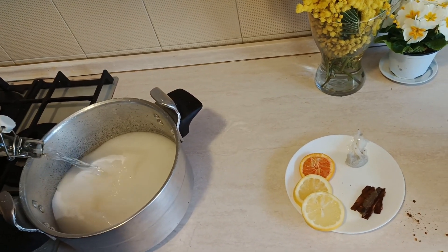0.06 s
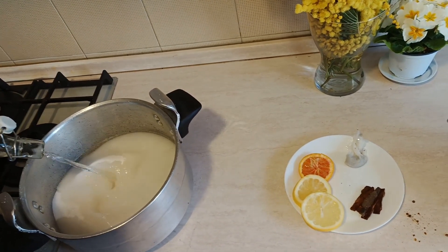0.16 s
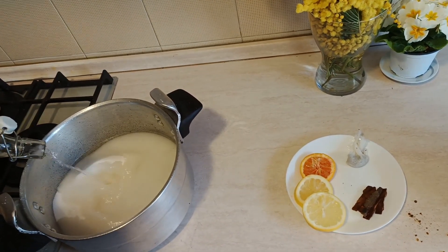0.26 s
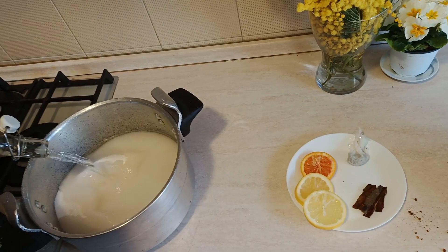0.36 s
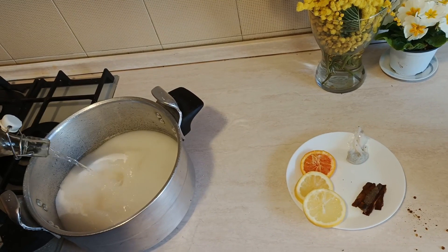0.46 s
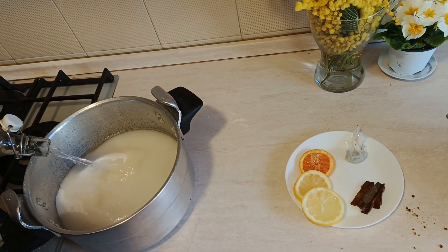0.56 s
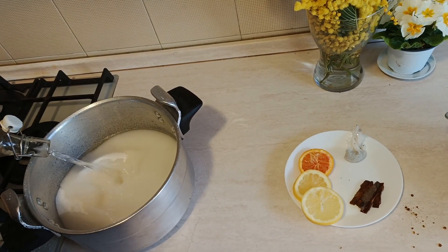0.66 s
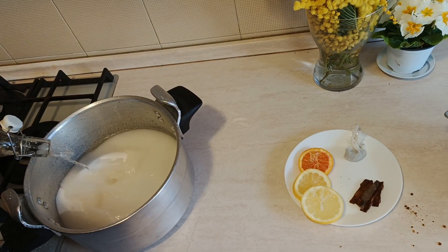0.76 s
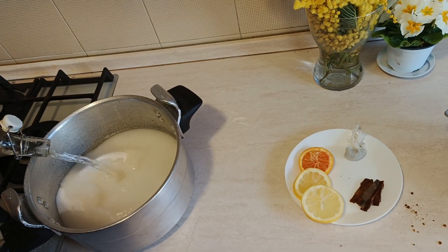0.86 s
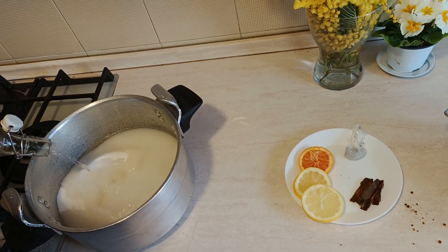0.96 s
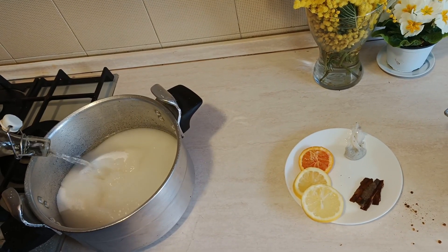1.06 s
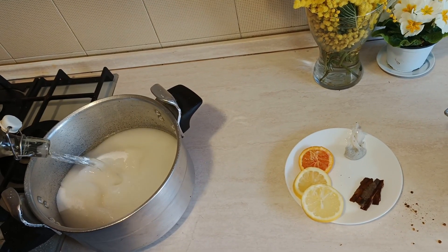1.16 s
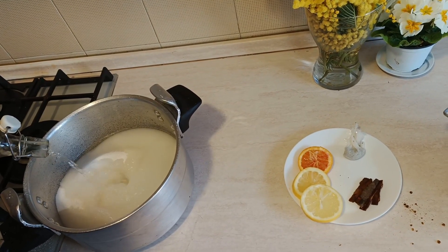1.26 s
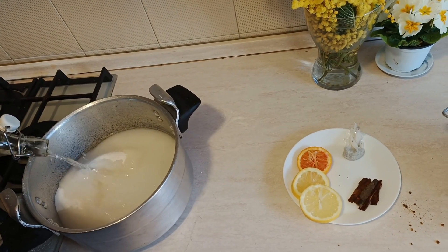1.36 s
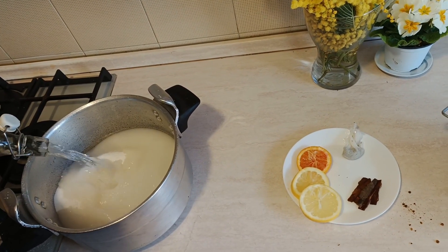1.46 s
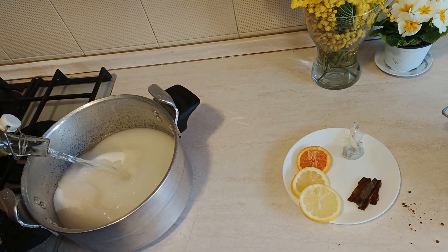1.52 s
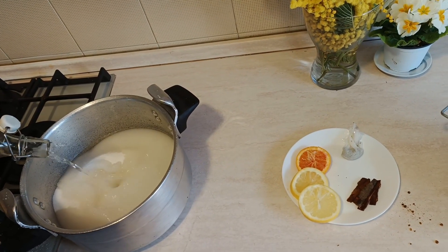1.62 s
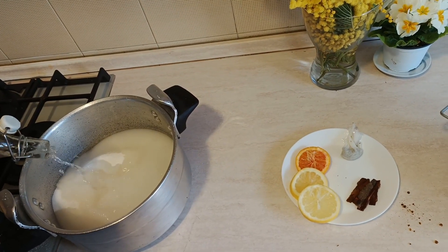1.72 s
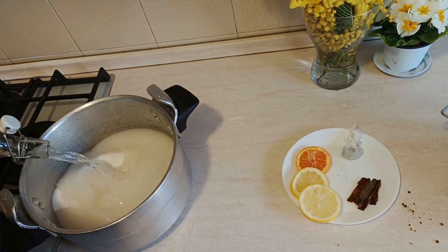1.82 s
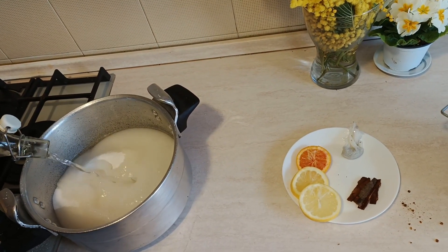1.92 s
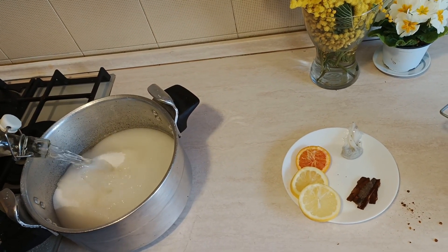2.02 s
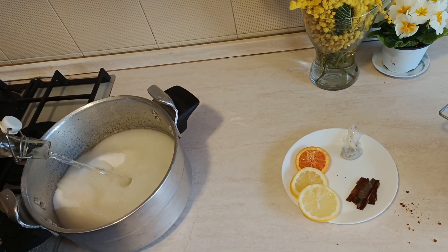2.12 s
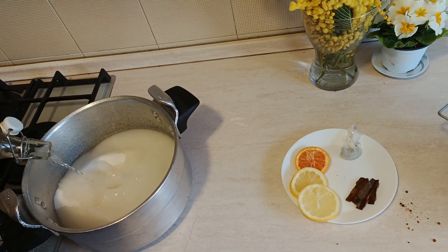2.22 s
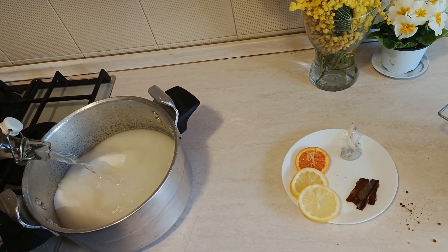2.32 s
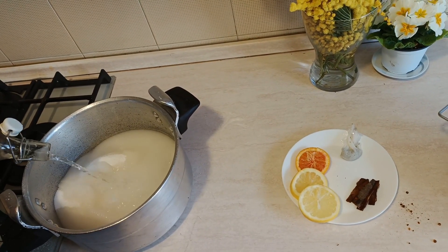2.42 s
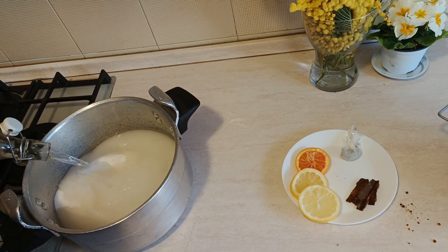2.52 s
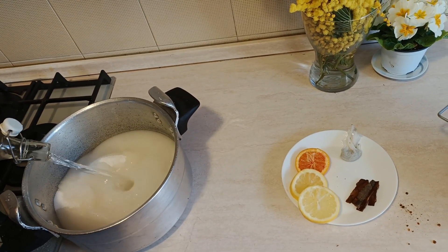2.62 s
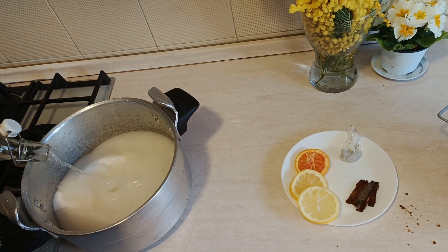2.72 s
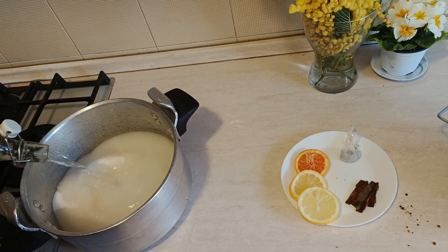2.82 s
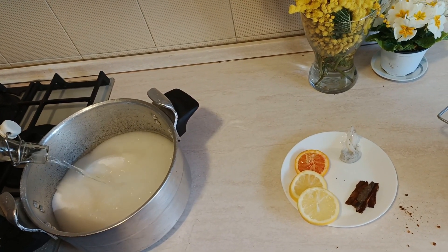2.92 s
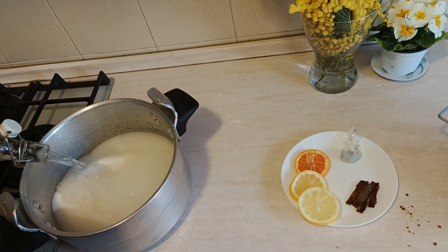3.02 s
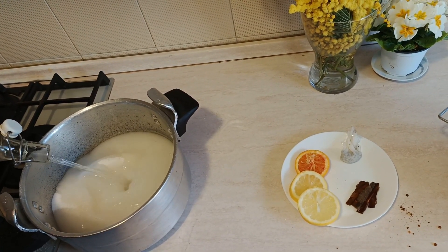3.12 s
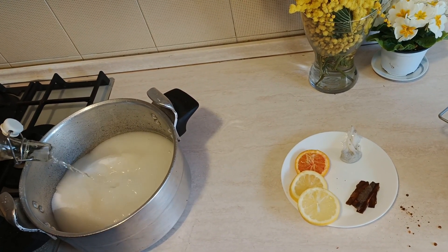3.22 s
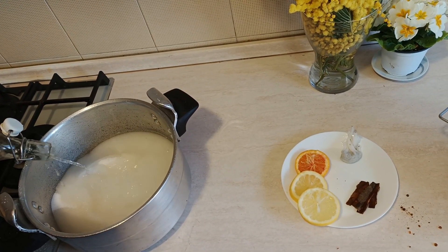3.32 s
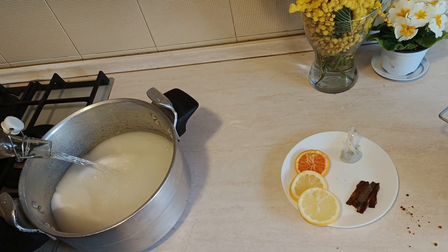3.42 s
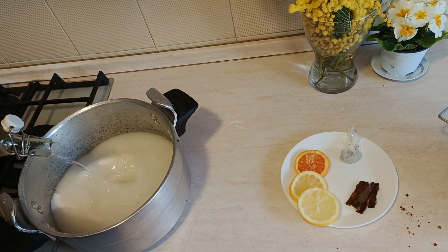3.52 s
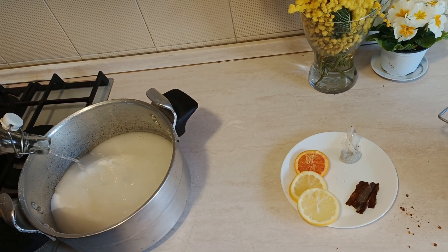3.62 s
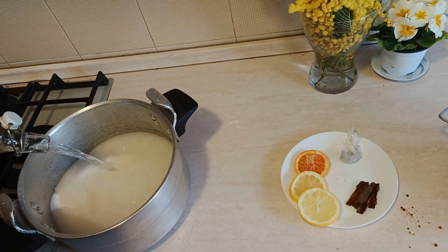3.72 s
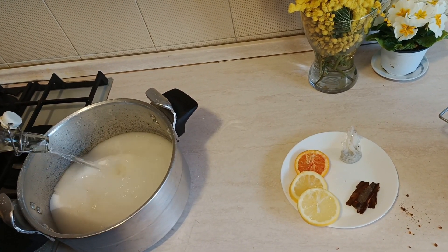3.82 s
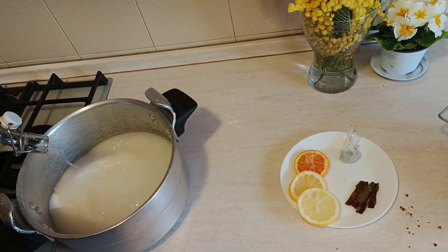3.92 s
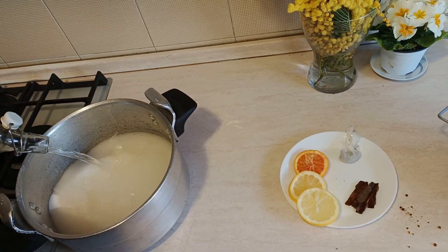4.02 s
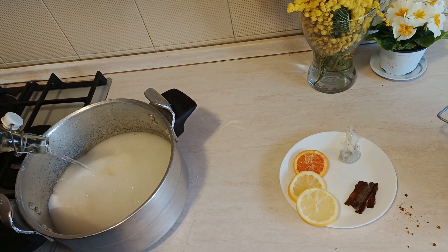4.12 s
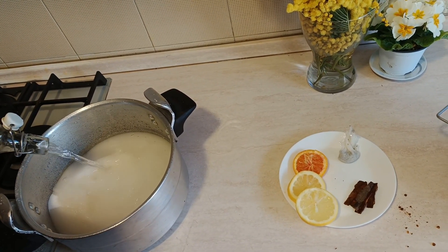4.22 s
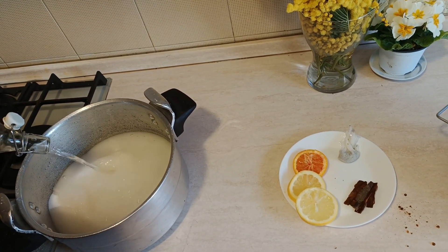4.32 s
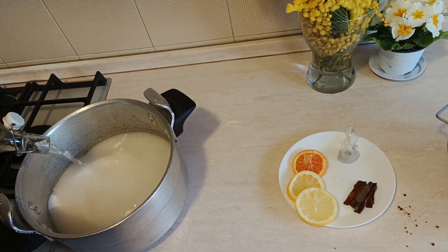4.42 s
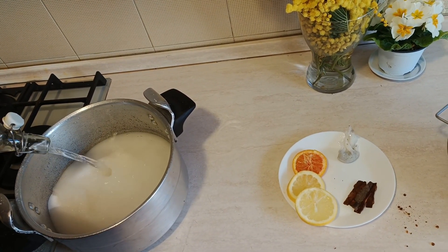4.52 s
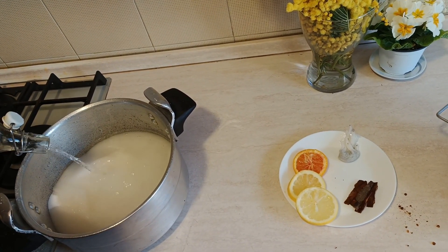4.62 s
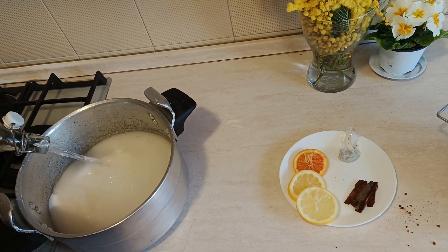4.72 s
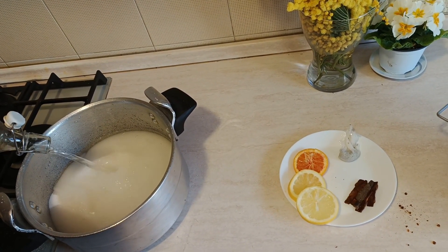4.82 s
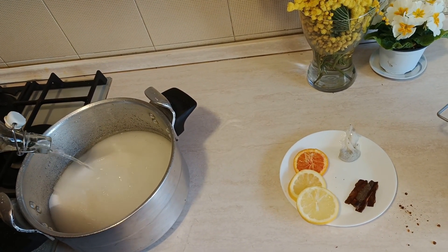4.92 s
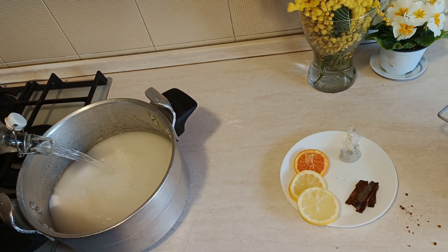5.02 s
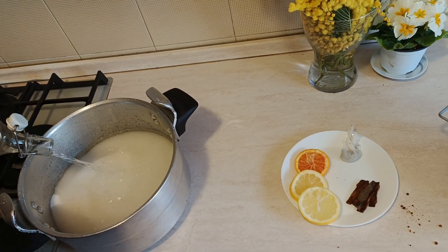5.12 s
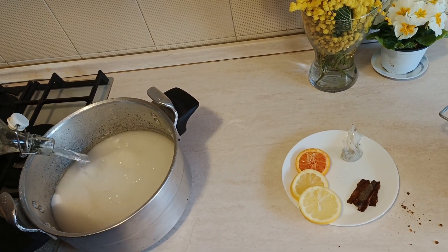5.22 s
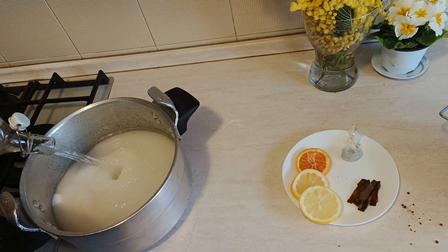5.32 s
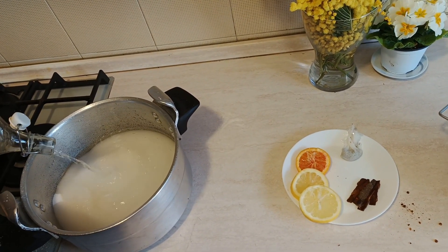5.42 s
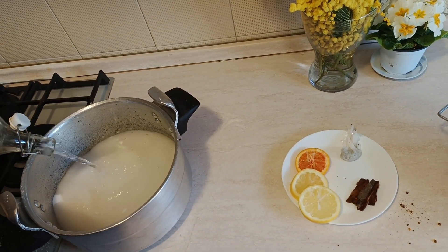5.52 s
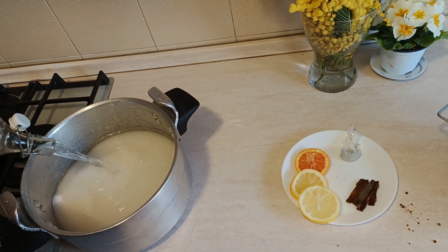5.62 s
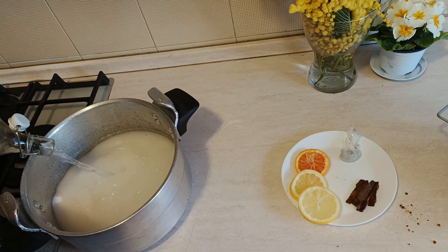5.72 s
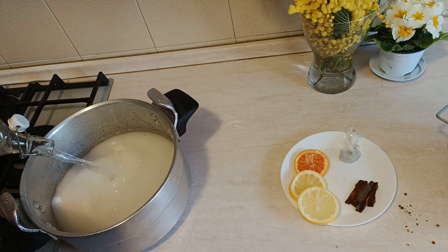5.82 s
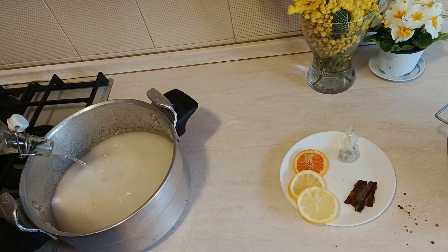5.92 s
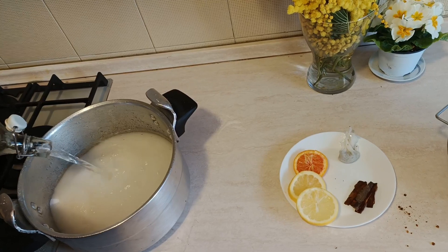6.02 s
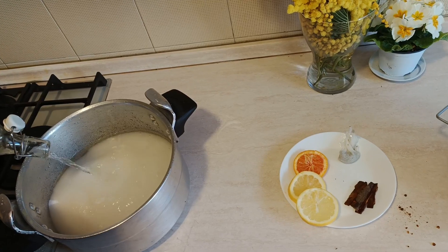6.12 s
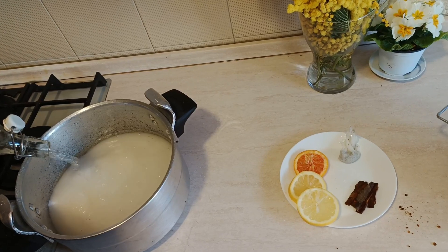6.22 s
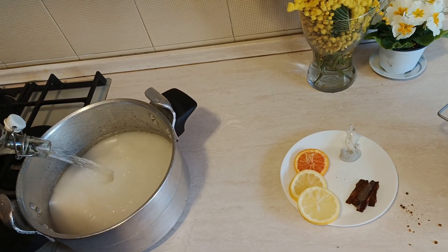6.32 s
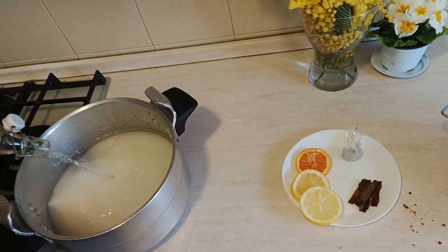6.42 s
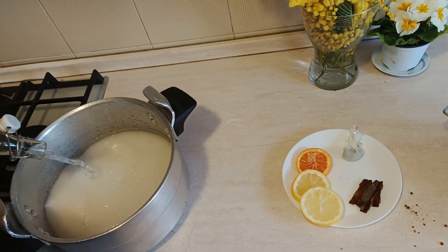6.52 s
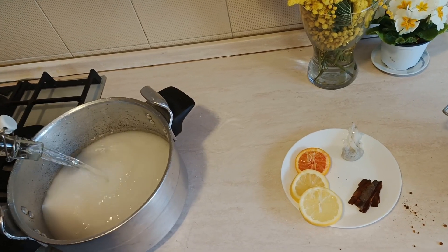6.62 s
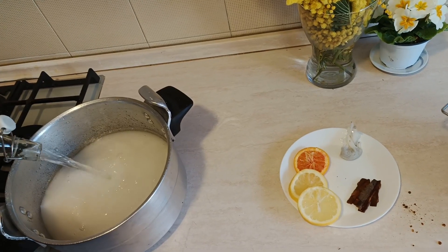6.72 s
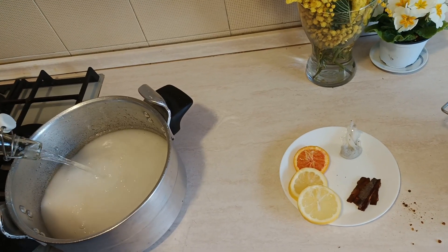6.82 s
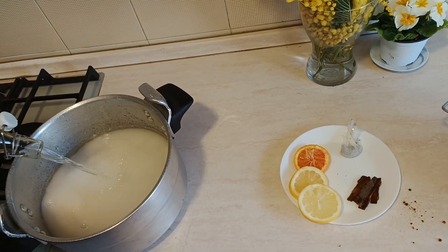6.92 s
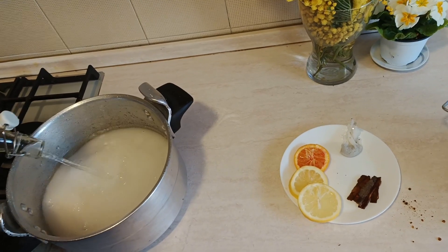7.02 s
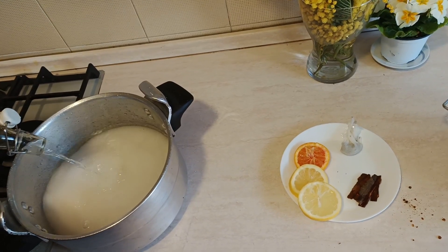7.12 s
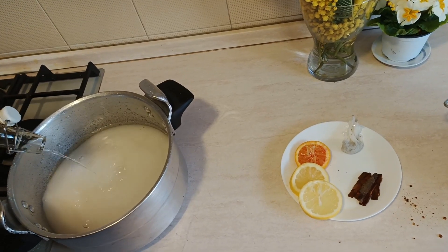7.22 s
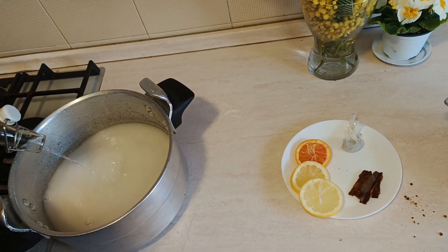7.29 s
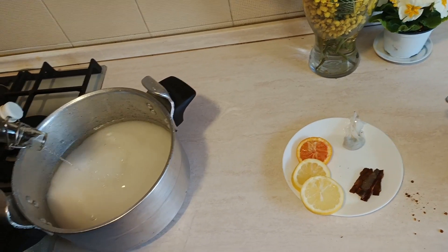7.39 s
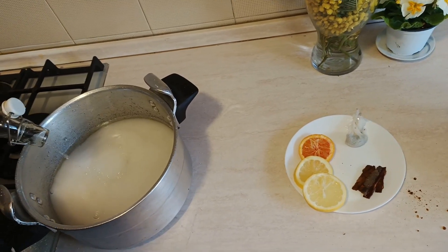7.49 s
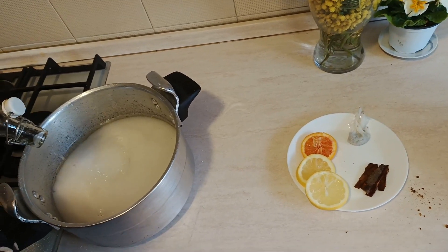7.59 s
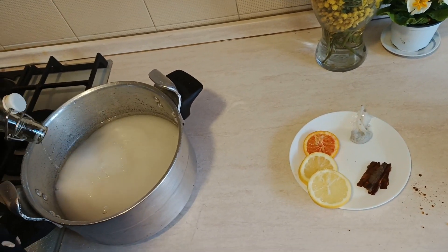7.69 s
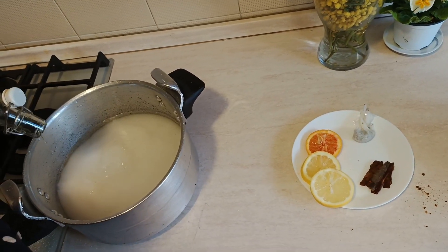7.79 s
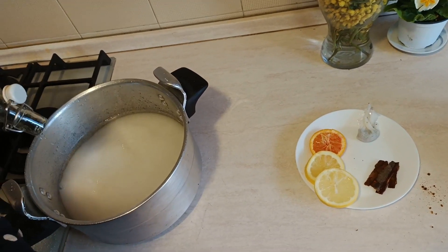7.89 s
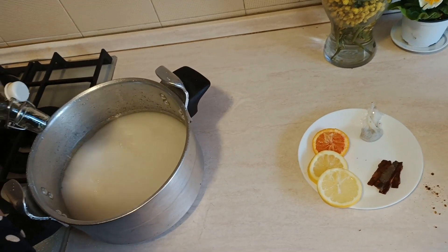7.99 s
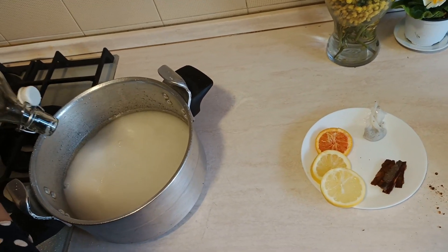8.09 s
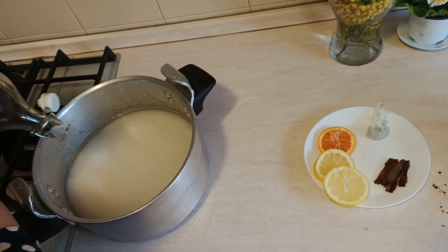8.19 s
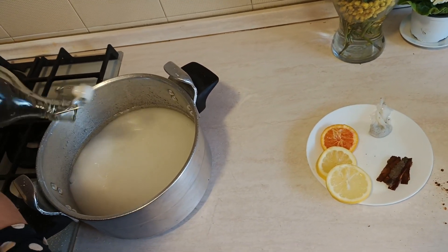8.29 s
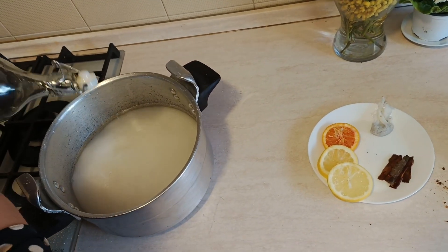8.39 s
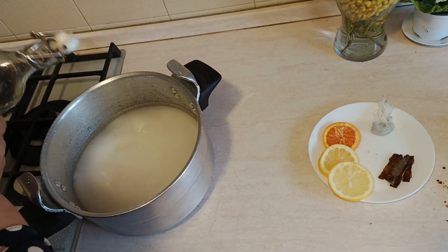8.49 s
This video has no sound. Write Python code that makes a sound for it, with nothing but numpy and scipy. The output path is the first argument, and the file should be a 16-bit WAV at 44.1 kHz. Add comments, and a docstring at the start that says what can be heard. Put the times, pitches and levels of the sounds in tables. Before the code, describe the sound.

From the start, water is already pouring from a glass bottle into liquid in a wide metal pot, heard close in stereo in a small kitchen with short reflections. It comes in quick glugs, about four a second, each a burst of fizzy bubbles, bright snapping plips and tiny spray ticks, with a faint metallic ring from the pot. From about 2 seconds the gurgle grows fuller; especially loud plops pop out near 4.0, 4.5 and 5.2 seconds. Low, hollow air gulps and deep gurgling are strongest around 5 to 6.5 seconds. Between 6.9 and 7.5 seconds, several dull finger bumps touch the microphone, mostly on the right, while the pour weakens. The last drops fall around 7.8 seconds. Only a soft appliance hum is left, with barely audible touches, until the wire stopper clinks sharply twice on the bottle neck at about 8.5 seconds, with tiny rattles around it.

```python
"""In a small kitchen, water glugs from a glass bottle into a wide metal pot, four or five surges a second.
Clumped grains make the fizz, slosh and gurgle; dying sines make the bubbles and the air gulped into the bottle.
The water rings the pot's modes, noise ticks make the spray, and dents with a slow swing make the finger bumps.
The last drops fall; shaped noise hums like an appliance behind, and struck modes make the wire stopper
clink twice on the bottle neck among fainter touches."""
import sys
import numpy as np
from scipy import signal
from scipy.fft import rfft, irfft
from scipy.io import wavfile

SR = 44100
rng = np.random.default_rng(int(sys.argv[2]) if len(sys.argv) > 2 else 0)


def amplitude_ratio(level_db):
    """Convert a level in decibels to the matching linear amplitude (field) ratio."""
    exponent = np.asarray(level_db, float) / 20
    return 10 ** exponent


def wav_record(signal):
    """Record a signal, one row per channel, as 16-bit PCM in the file named by sys.argv[1]."""
    frames = np.transpose(np.atleast_2d(signal))
    bounded = np.clip(frames, -1, 1)
    # unit amplitude maps onto the largest positive 16-bit level
    quanta = np.round(bounded * 32767).astype(np.int16)
    wavfile.write(sys.argv[1], SR, quanta)


N = 377055   # length in samples

# loudest small bubbles snapping shut at the surface: [t/s, level/dB, f/Hz, cycles to fall 60 dB]
SURFACE_SNAPS = [(.019, -27.5, 4640, 22), (.06, -26.5, 5150, 22), (.0855, -20, 2630, 29),
                 (.1562, -25.5, 2700, 30), (.1965, -25, 6350, 35), (.2245, -21, 4320, 21),
                 (.3048, -27, 3470, 33), (.317, -17.5, 3100, 25), (.374, -23.5, 4060, 21),
                 (.4209, -23, 4360, 23), (.492, -21, 5570, 23), (.5314, -17.5, 3470, 34),
                 (.5635, -26, 4120, 40), (.5921, -19, 2930, 29), (.6123, -17, 3430, 16),
                 (.6957, -17.5, 5300, 24), (.7507, -23, 2400, 52), (.8342, -19.5, 3360, 11),
                 (.9594, -19.5, 4070, 21.8), (1.0824, -24, 4100, 19), (1.1026, -21.5, 2530, 11),
                 (1.1406, -26.5, 2530, 12), (1.2042, -24, 4380, 32), (1.248, -30.5, 2410, 28),
                 (1.316, -15.5, 5200, 24), (1.4696, -28, 2400, 10), (1.6344, -18, 5100, 19),
                 (1.725, -22.5, 2330, 52), (1.7435, -21, 3720, 15), (1.8426, -27.5, 3120, 42),
                 (1.9143, -23, 3640, 41), (1.954, -25.5, 5100, 49), (2.0903, -26, 4790, 16),
                 (2.1293, -25, 4160, 20), (2.2976, -24, 2660, 9.8), (2.323, -28, 4800, 14),
                 (2.3468, -27, 2800, 26), (2.3908, -20, 2960, 23), (2.5591, -25.5, 3640, 22),
                 (2.608, -25.5, 3660, 23), (2.6863, -24.5, 5130, 15), (2.729, -25, 3640, 37),
                 (2.91, -20.5, 5040, 23), (2.9392, -26, 4540, 25), (2.9677, -20, 5160, 22),
                 (3.0588, -17.5, 4530, 20), (3.1023, -24.5, 4880, 34), (3.16, -23.5, 3100, 15.5),
                 (3.3638, -24.5, 3300, 13), (3.3919, -18, 3120, 18), (3.544, -24.5, 5050, 23),
                 (3.583, -23.5, 2530, 11), (3.6749, -25.5, 3630, 26), (3.714, -18, 6430, 19.6),
                 (3.933, -25.5, 1870, 42), (3.9538, -21, 3080, 13), (3.9718, -9, 2073, 38),
                 (4.0864, -20, 5140, 21.5), (4.129, -34, 2520, 50), (4.2056, -26.5, 4300, 40),
                 (4.2248, -29.5, 3700, 47), (4.2646, -26, 3140, 33), (4.3955, -25, 3830, 52),
                 (4.4779, -12, 3130, 30), (4.5093, -23, 3220, 25), (4.552, -23.5, 3870, 28),
                 (4.7132, -26, 3180, 32), (4.8889, -21.5, 4000, 35), (4.9202, -26, 3340, 35),
                 (4.953, -26, 4000, 28), (4.9816, -27, 3680, 31), (5.016, -31, 3300, 29),
                 (5.0908, -25.5, 5430, 19), (5.1562, -25, 4000, 21), (5.2492, -14, 3070, 18),
                 (5.2985, -21.5, 2500, 25), (5.3298, -22.5, 3810, 54), (5.5134, -32, 2540, 36),
                 (5.5238, -23, 3950, 11), (5.5775, -25, 4830, 35), (5.6215, -21.5, 3050, 23),
                 (5.8708, -23.5, 4600, 24), (6.0506, -21.5, 2900, 17), (6.0812, -26, 4950, 40),
                 (6.1154, -20.5, 4870, 18), (6.131, -19.5, 4460, 40), (6.2359, -21.5, 2560, 27),
                 (6.2474, -28, 6500, 16), (6.2984, -24, 2850, 32), (6.3372, -26, 2520, 40),
                 (6.5136, -28, 2600, 24), (6.616, -19.5, 4900, 24), (6.688, -26.5, 3060, 29),
                 (7.1348, -30.5, 2620, 23), (7.165, -31, 5640, 28), (7.3637, -25.5, 5360, 16),
                 (7.3845, -29, 2620, 32), (7.4107, -23, 6500, 55), (7.447, -23, 4920, 28),
                 (7.6808, -27.5, 4380, 46), (7.752, -25, 2594, 91)]
# large bubbles dragged under: [t/s, level/dB, f/Hz]
LARGE_BUBBLES = [(0.467, -47, 1100), (.833, -34, 1280), (.963, -37.5, 1083), (1.107, -49, 582),
                 (1.306, -42.5, 759), (1.385, -42, 594), (1.478, -37.5, 1407), (1.597, -35, 1300),
                 (1.659, -33.5, 1254), (1.763, -38.5, 825), (1.822, -42, 759), (2.131, -34.5, 1046),
                 (2.306, -43, 596), (2.396, -40, 853), (2.559, -41, 568), (2.912, -47, 400),
                 (3.057, -38.5, 747), (3.159, -38, 593), (3.21, -36, 1120), (3.331, -40.5, 300),
                 (3.38, -32.5, 764), (3.493, -37.5, 760), (3.583, -37.5, 620), (3.674, -33, 342),
                 (3.717, -35, 1250), (3.796, -37, 759), (3.97, -44, 430), (4.276, -36.5, 870),
                 (4.472, -39.5, 965), (4.975, -44, 598), (5.063, -45.5, 610), (5.317, -41, 1020),
                 (5.39, -40, 587), (5.552, -28, 1720), (5.589, -38.5, 1040), (5.773, -54, 510),
                 (5.837, -41, 314), (5.954, -37.5, 974), (6.053, -39, 280), (6.095, -42, 740),
                 (6.248, -38, 572), (6.299, -46, 740), (6.435, -37, 1135), (6.511, -51, 564),
                 (6.788, -41, 338), (7.426, -39, 1096), (7.456, -36, 740), (7.627, -34.5, 993),
                 (7.66, -41, 1040), (7.693, -31.5, 1110)]
# air gulped into the bottle: [t/s, level/dB, f/Hz, t60/s]
AIR_GULPS = [(.669, -42, 173.5, 0.25), (2.407, -41, 117, 0.051), (2.81, -51, 95, 0.14),
             (3.455, -31, 107, .068), (3.672, -45, 97, 0.11), (3.812, -44, 115, 0.13),
             (4.331, -45, 102, 0.11), (4.589, -35, 127, 0.089), (4.843, -37, 117, .05),
             (4.975, -46, 95, 0.15), (5.111, -50, 83, .16), (5.365, -36, 108, 0.078),
             (5.519, -47, 98, 0.081), (5.646, -35, 98, 0.04), (5.836, -30.5, 117, 0.037),
             (6.075, -27, 105, 0.025), (6.328, -36, 123, 0.061), (6.409, -42, 102, 0.052),
             (6.636, -38, 88.4, 0.4), (6.785, -40, 84.5, 0.17)]
# finger bumps on the microphone housing: [t/s, level/dB, dent scale/ms, left over right/dB]
FINGER_BUMPS = [(6.8617, -16, 0.68, -33), (6.897, -19.5, 1, -25), (7.0828, -15, 0.57, -31),
                (7.1, -22.5, 1, -19), (7.267, -13, 0.091, 11), (7.3109, -22, 0.71, -31),
                (7.3720, -21.5, 0.62, -32), (7.5267, -14, 0.75, -34)]
# stopper wire touching glass: [t/s, level/dB, low-mode boost/dB, high-mode boost/dB]
WIRE_TOUCHES = [(8.052, -58, -20, 21), (8.307, -42, -20, -20), (8.4620, -13.5, -39, -4),
                (8.475, -27, -17, -10), (8.4838, -22.5, -12, -6), (8.4984, -14, 3, -27),
                (8.5069, -20.5, -12, -3), (8.527, -22, -15, -15)]
# modes of bottle neck and wire: [f/Hz, relative level/dB, t60/s]
NECK_MODES = [(1790, -24, .12), (2293, -17, .11), (2772, -16, .15), (2950, -15, .04), (3090, -13, .05),
              (3400, -18, .1), (3612, -15, .05), (4020, -18, .05), (4510, -4, .045), (4620, -8, .05),
              (4703, -13, .15), (4900, -16, .08), (5552, -11, .14), (5720, -16, .06), (6100, -19, .05),
              (6480, -12, .06), (7260, -21, .08), (7660, -16, .07), (8072, -17, .09), (9745, -19, .09),
              (12550, -26, .06), (15300, -21, .025)]
# modes of the pot wall and the air inside: [f/Hz, relative level/dB, t60/s]
POT_MODES = [(125.8, 3.5, 0.51), (325, -40, .2), (479, -36, 0.29), (598, -8, 0.33), (759, 4.5, 0.5),
             (853, 3, 0.38), (1040, -25, 0.13), (1100, -7, 0.24), (1900, 9, 0.24), (2564, 14, 0.04)]
# colour of fizz and spray: [f/Hz, relative level/dB]
FIZZ_COLOUR = [(1700, 14), (2050, -7.5), (2250, -6), (2600, 6.5), (3200, -3.5), (4000, 1.5), (5000, 1.5),
               (6300, 3.5), (7500, -25), (9000, 22), (13000, -9), (15500, -4)]
# colour of the appliance hum: [f/Hz, relative level/dB]
HUM_COLOUR = [(25, -32), (45, -9), (100, -3.5), (170, -11.5), (220, -13.5), (330, -14.5), (600, -19.5),
              (900, -7.5), (1400, -11), (1900, -21), (3200, -13), (5200, -10.5), (7600, -21),
              (10000, -31.5), (16000, -27)]
# blurred whines in the hum: [f/Hz, width/Hz, rms level/dB]
HUM_WHINES = [(129.5, 46, -63), (1263, 44, -63.5), (3120, 130, -63.5), (4040, 270, -61), (5110, 720, -57),
              (6955, 120, -62.5), (12560, 2200, -70.5)]
# balance of the two microphones: [f/Hz, left over right level/dB]
STEREO_TILT = [(200, -0.5), (700, 2), (1300, 4), (1900, -10), (2600, -8), (3300, 4), (4400, 1.5),
               (6300, 3.5), (7300, -14.5), (8500, 23), (11000, 9), (15500, 3)]
# slugs of water landing, one per glug: [t/s, fizz level/dB, slosh level/dB, gurgle level/dB]
WATER_SURGES = [(.05, -43, -58, -57), (0.301, -42, -71, -83), (.53, -51, -62, -80), (0.751, -40, -57, -72),
                (0.948, -54, -72, -57), (1.08, -44.5, -79, -71.5), (1.305, -40, -60, -60),
                (1.47, -47.5, -75, -80), (1.725, -40.5, -66, -76), (1.765, -63, -53, -59),
                (2.086, -40.5, -50.5, -55.5), (2.298, -45, -56, -49), (2.56, -42.5, -60, -47.5),
                (2.82, -40, -56, -55), (3.054, -63, -56, -51), (3.156, -45, -56, -50.5),
                (3.324, -45.5, -47.5, -44), (3.49, -64, -69, -52), (3.671, -46.5, -62, -45.5),
                (3.795, -51, -60, -56), (3.963, -39, -60, -50), (4.27, -47.5, -73, -70),
                (4.472, -59, -69, -54), (4.72, -44.5, -70, -51.5), (4.972, -45, -79, -48.5),
                (5.245, -47.5, -57, -58), (5.518, -40, -50, -48), (5.772, -41.5, -61, -45),
                (6.048, -40.5, -69, -49), (6.245, -46, -57, -48.5), (6.508, -41, -55, -46.5),
                (6.781, -43, -70, -49), (6.92, -47, -53, -60), (7.129, -45, -53, -54.5),
                (7.362, -47, -70, -53), (7.6, -51, -62, -78)]
# share of the deepest gurgle, faint at first and strongest near 5.7 s: [t/s, level over the other gurgle/dB]
DEEP_GURGLE_SHARE = [(0, -13), (2.2, -12), (3.3, -8.5), (4.4, -12.5), (5.7, -1), (7.7, -8.5)]
# droplets of spray ticking on the pot wall: [t/s, level/dB]
SPRAY_DROPLETS = [(0.2309, -36), (0.2947, -42), (0.4199, -33), (0.4913, -42), (0.5751, -34),
                  (0.6399, -29.5), (0.6956, -30), (1.0814, -31), (1.2042, -34), (1.3164, -28),
                  (1.5424, -31), (1.634, -34.5), (1.7235, -44), (1.8427, -36), (2.0906, -32),
                  (2.2189, -28.5), (2.296, -32), (2.3705, -33), (2.5631, -32), (2.607, -30), (2.6893, -42),
                  (2.7297, -42), (2.8759, -38), (2.9711, -43), (2.9896, -37), (3.242, -32), (3.321, -28),
                  (3.3907, -38), (3.714, -38), (3.8422, -38), (3.9599, -41), (4.0961, -45), (4.3271, -37),
                  (4.3715, -32), (4.3954, -34), (4.4777, -36), (4.556, -37), (4.592, -38), (4.8893, -43),
                  (5.1721, -35), (5.2485, -49), (5.2645, -34), (5.5255, -33), (5.6301, -29), (5.8391, -41),
                  (5.9653, -31), (6.0506, -33), (6.1135, -43), (6.2472, -27), (6.5136, -36), (6.6298, -33),
                  (6.783, -28.5), (7.0409, -37), (7.2988, -33.5), (7.3422, -31), (7.4465, -40),
                  (7.648, -36), (7.7343, -44), (7.752, -41), (7.9139, -44)]

# a surge swells, holds and dies: (attack s, hold s, t60 s)
FIZZ_SHAPE, SLOSH_SHAPE, GURGLE_SHAPE = (0.02, 0.048, 0.79), (0.023, 0.11, 0.2), (0.0022, 0.01, 0.64)
# the thin trickle between surges, until the pouring stops
TRICKLE_FIZZ_DB, POUR_END_S = -52.5, 7.76


def rms_one(x):
    """Scale to rms 1."""
    return x / np.sqrt(np.mean(x ** 2) + 1e-20)


def at_hz(points, hz):
    """Read a spectrum, straight on a log frequency axis."""
    points_hz, db = np.array(points).T
    return np.interp(np.log(np.maximum(hz, 1)), np.log(points_hz + 1e-9), db)


def band(x, order, hz, kind):
    """Butterworth filter."""
    return signal.sosfilt(signal.butter(order, hz, kind, fs=SR, output="sos"), x)


def drift(rate_hz):
    """Slow random wander of spread 1, made at every 40th sample and joined by lines."""
    r = np.exp(-80 * np.pi * rate_hz / SR)
    noise = rng.standard_normal(N // 40 + 2002)
    slow = signal.lfilter([1], [1, -2 * r, r * r], noise)[2000:]   # drop the run-in
    return np.interp(np.arange(N) / 40, np.arange(len(slow)), rms_one(slow))


def ring(force, hz, t60):
    """A resonator: a unit click sets a dying sine of height about 1 ringing."""
    r, w = amplitude_ratio(-60 / (t60 * SR)), 2 * np.pi * hz / SR
    return signal.lfilter([0, np.sin(w)], [1, -2 * r * np.cos(w), r * r], force + 1e-18)


def add(out, s, sound):
    """Mix a short sound in at time s."""
    i = round(s * SR)
    out[..., i:i + sound.shape[-1]] += sound[..., :N - i]


def bubble(hz, t60, rise, swell):
    """A dying sine of peak 1; pitch climbs by the share rise over t60, onset scales with swell cycles."""
    t = np.arange(int(t60 * SR) + 9) / SR
    wave = np.sin(2 * np.pi * hz * t * (1 + .5 * rise * t / t60))
    wave = wave * (1 - np.exp(-t * hz / swell)) ** 2 * amplitude_ratio(-60 * t / t60)
    return wave / np.abs(wave).max()


def stereo_noise(size):
    """Two noises, alike in the bass and unrelated in the treble."""
    shared, own = rng.standard_normal(size), rng.standard_normal((2, size))
    low = signal.butter(1, 240, fs=SR)   # alike below 240 Hz
    return signal.lfilter(*low, shared) + own - 0.66 * signal.lfilter(*low, own)


def hum():
    """An appliance: steady broad noise, with narrow bands of the same noise as blurred whines."""
    f = np.fft.rfftfreq(N, 1 / SR)
    spectrum = rfft(stereo_noise(N))
    out = amplitude_ratio(-53.5) * rms_one(irfft(spectrum * amplitude_ratio(at_hz(HUM_COLOUR, f)), N))
    for hz, width_hz, db in HUM_WHINES:
        resonance = 1 / (1 + ((f - hz) / (width_hz / 2)) ** 2)
        out += amplitude_ratio(db) * rms_one(irfft(spectrum * resonance, N))
    return out


def flow(column, shape, trickle_db=-120):
    """Power of one layer of the stream: surges of one shape over the trickle, until the pouring stops."""
    attack_s, hold_s, t60 = shape
    t = np.arange(N) / SR
    out, u = amplitude_ratio(2 * trickle_db) * np.ones(N), t[:SR]
    swell = np.minimum(u / attack_s, 1) ** 2
    surge = swell * amplitude_ratio(-120 * np.maximum(u - attack_s - hold_s, 0) / t60)
    for row in WATER_SURGES:
        add(out, max(row[0] - .5 * attack_s, 0), amplitude_ratio(2 * row[column]) * surge)
    return out * amplitude_ratio(-120 * np.maximum(t - POUR_END_S, 0) / 0.13)


def fizz_flow():
    """Power of the fizz of surges and trickle."""
    return flow(column=1, shape=FIZZ_SHAPE, trickle_db=TRICKLE_FIZZ_DB)


def bursts(rows):
    """Power envelope of sudden bursts (s, dB, t60 s) that die away."""
    out = np.zeros(N)
    for s, db, t60 in rows:
        u = np.arange(int(t60 * SR)) / SR
        add(out, s, amplitude_ratio(2 * db - 120 * u / t60))
    return out


def grains(per_s, pitches_hz, gains_db, cycles, spread_db, clump_db):
    """Clumped random bubbles dealt to resonators; rms 1."""
    sizes = amplitude_ratio(spread_db * np.minimum(rng.exponential(1, N), 4)) * rng.choice([-1, 1], N)
    born = rng.random(N) < per_s * amplitude_ratio(clump_db * drift(25)) / SR
    clicks = sizes * born
    dealt = rng.integers(0, len(pitches_hz), N)
    out = np.zeros(N)
    for k, (hz, db) in enumerate(zip(pitches_hz, gains_db)):
        out += amplitude_ratio(db) * ring(clicks * (dealt == k), hz, cycles / hz)
    return rms_one(out)


def stream(snap_rows):
    """Bubble grains as fizz, spray, slosh and gurgle follow the surges; snaps stir up more fizz."""
    high, top = np.geomspace(1900, 7200, 30), np.geomspace(7500, 15500, 6)
    low, middle = np.geomspace(430, 1450, 12), np.geomspace(1700, 2150, 6)
    high_db = at_hz(FIZZ_COLOUR, high) + 10 * np.log10(high)
    top_db = at_hz(FIZZ_COLOUR, top) + 10 * np.log10(top)
    fizz = grains(900, high, high_db, cycles=24, spread_db=5, clump_db=5)
    spray = grains(350, top, top_db, cycles=6, spread_db=5.5, clump_db=5)
    slosh = grains(300, middle, 0 * middle, cycles=20, spread_db=5, clump_db=5)
    gurgle = grains(600, low, 1.5 * np.log2(low / 600), cycles=18, spread_db=3, clump_db=2.5)
    deep = grains(150, np.geomspace(280, 420, 4), np.zeros(4), cycles=16, spread_db=3, clump_db=2.5)
    deep_db = np.interp(np.arange(N) / SR, *np.transpose(DEEP_GURGLE_SHARE))
    gurgle = band(gurgle, 2, 380, "high") + amplitude_ratio(deep_db) * deep
    gurgle = band(gurgle, 2, 200, "high")
    stirred = bursts((row[0], row[1] - 22, .15) for row in snap_rows)
    out = np.sqrt(fizz_flow() + stirred) * (fizz + amplitude_ratio(-22.0) * spray)
    out += np.sqrt(flow(column=3, shape=GURGLE_SHAPE)) * gurgle
    return out + np.sqrt(flow(column=2, shape=SLOSH_SHAPE)) * slosh


def pot(water):
    """The water's sound shakes the wall, whose modes ring on."""
    return sum(amplitude_ratio(db - 64.0) * ring(water, hz, t60) for hz, db, t60 in POT_MODES)


def big_bubbles(table, rise, swell, lead_s):
    """Slow bubbles, one per row, each starting lead_s ahead of its time."""
    out = np.zeros(N)
    for s, db, hz, t60 in table:
        add(out, s - lead_s, amplitude_ratio(db) * bubble(hz, t60, rise, swell))
    return out


def plunge_t60(hz):
    """Decay in s of a bubble dragged under: big, low bubbles ring longer."""
    return 0.054 * (hz / 600) ** -0.25


def lesser_plunges():
    """Lesser bubbles dragged under at random, gliding up in pitch, their level following the gurgle."""
    count, over_gurgle_db, spread_db, low_hz, high_hz = 200, 8.5, 3.5, 431, 1710
    gurgle = flow(column=3, shape=GURGLE_SHAPE)
    when, pitch = rng.random((count, 2)).T
    s = .01 + when * POUR_END_S
    db = 10 * np.log10(gurgle[(s * SR).astype(int)]) + over_gurgle_db
    db = db + spread_db * rng.standard_normal(count)
    hz = low_hz * (high_hz / low_hz) ** pitch
    rows = np.transpose([s, db, hz, 0.58 * plunge_t60(hz)])
    return big_bubbles(rows, rise=.3, swell=1.0, lead_s=0)


def all_snaps():
    """The loud snaps, then lesser ones at random whose level follows the fizz, in rows alike."""
    count, over_fizz_db, spread_db, low_hz, high_hz, cycles = 150, 11.5, 2.5, 2370, 6500, 21.5
    when, pitch = rng.random((count, 2)).T
    size, ringing = rng.standard_normal((count, 2)).T
    s = when * POUR_END_S
    db = 10 * np.log10(fizz_flow()[(s * SR).astype(int)]) + over_fizz_db + spread_db * size
    hz = low_hz * (high_hz / low_hz) ** pitch
    lesser = np.transpose([s, db, hz, cycles * np.exp(0.65 * ringing)])
    return np.vstack([SURFACE_SNAPS, lesser])


def snaps(rows):
    """Each snap is a broad crack, a short bubble tone with close neighbours and stragglers, and a tick of spray."""
    out, t = np.zeros(N), np.arange(300) / SR
    chance, noise = rng.standard_normal((len(rows), 10)), rng.standard_normal((len(rows), 300))
    tick = band(noise, 2, [7000, 13500], "band")
    tick *= amplitude_ratio(-60 * t / 0.0044) * (1 - np.exp(-t / 0.00023))
    crack = band(noise * amplitude_ratio(-60 * t / 0.0053), 2, [2200, 6200], "band")
    for (s, db, hz, cycles), c, spray, broad in zip(rows, chance, tick, crack):
        add(out, s, amplitude_ratio(db) * bubble(hz, cycles / hz, rise=0.0057, swell=0.95))
        mess = min(25 / cycles, 1.5)   # a long-ringing bubble closes cleanly, its neighbours near its pitch
        for detune, late in (c[:2], c[2:4]):
            near = hz * np.exp(0.237 * mess * detune)
            tone = bubble(near, cycles / near, rise=0.58, swell=1.0)
            add(out, s + 0.0025 * abs(late), amplitude_ratio(db - 8.5) * tone)
        for detune, late in c[4:].reshape(3, 2):   # smaller bubbles keep closing nearby
            near = hz * np.exp(0.14 * mess * detune)
            tone = bubble(near, cycles / near, rise=0.25, swell=1.6)
            add(out, s + 0.0045 + .022 * abs(late), amplitude_ratio(db - 15.0) * min(mess, 1) * tone)
        add(out, s, amplitude_ratio(db - 10.5) * spray + amplitude_ratio(db - 1.5) * mess * broad)
    return out


def droplets():
    """Each droplet on the pot wall is a short tick of treble noise."""
    out, t = np.zeros(N), np.arange(300) / SR
    tick = band(rng.standard_normal((len(SPRAY_DROPLETS), 300)), 2, [7500, 14500], "band")
    tick *= amplitude_ratio(-60 * t / 0.0088) * (1 - np.exp(-t / 0.00047))
    for (s, db), one in zip(SPRAY_DROPLETS, tick):
        add(out, s, amplitude_ratio(db) * one / np.abs(one).max())
    return out


def plunges():
    """Large bubbles dragged under ring low and glide up a little."""
    rows = [(s, db, hz, plunge_t60(hz)) for s, db, hz in LARGE_BUBBLES]
    return big_bubbles(rows, rise=0.11, swell=0.82, lead_s=0.001876)


def gulps():
    """Air gulped into the bottle booms low, sagging in pitch."""
    return big_bubbles(AIR_GULPS, rise=-0.21, swell=0.28, lead_s=0.0036)


def hollow(x):
    """The pot's shape cancels a share of one band of the water's sound."""
    hz, width_hz, share = 1555, 84, 0.68
    return x - share * signal.lfilter(*signal.iirpeak(hz, hz / width_hz, fs=SR), x)


def bumps():
    """A finger dents the housing sharply, then it swings back slowly; mostly in the nearer microphone."""
    out, t = np.zeros((2, N)), np.arange(900) / SR
    for s, db, dent_ms, pan_db in FINGER_BUMPS:
        dent = np.exp(-.5 * ((t * 1000 - 2 * dent_ms) / (0.3 * dent_ms)) ** 2)
        back = ring(dent / dent.sum(), 190 / dent_ms * 0.55, 0.024 * dent_ms)
        sides = amplitude_ratio([[min(pan_db, 0)], [min(-pan_db, 0)]])
        add(out, s, amplitude_ratio(db) * sides * (0.89 * back - dent))
    return signal.lfilter(*signal.butter(2, 4000, fs=SR), out)


def stopper():
    """Every touch strikes all modes and cracks; where it lands shifts weight to the low or the high modes."""
    out, t = np.zeros(N), np.arange(400) / SR
    rows = np.array(WIRE_TOUCHES)
    s, level_db, low_db, high_db = rows.T
    for hz, db, t60 in NECK_MODES:
        clicks = np.zeros(N)
        clicks[(s * SR).astype(int)] = amplitude_ratio(level_db + db + (hz < 3300) * low_db + (hz > 7000) * high_db)
        out += ring(clicks, hz, t60)
    crack = rng.standard_normal((len(rows), 400)) * amplitude_ratio(-60 * t / 0.023) * (1 - np.exp(-t / 0.0012))
    crack = band(crack, 2, [2600, 7200], "band")
    for row, c in zip(rows, crack):
        add(out, row[0], amplitude_ratio(row[1] + 2.5) * c)
    out = band(out, 3, 1700, "high")   # small parts radiate no bass
    thud = bubble(380, 0.0077, rise=0, swell=0.083)
    add(out, s[-3], amplitude_ratio(-39) * thud)   # the lower blow thuds in the bottle's body
    return out


def kitchen(x):
    """Dense reflections: dying noise, other in each ear, starting with the pot's inner echoes."""
    t = np.arange(SR // 2) / SR
    inner_echoes = 1 + 4.15 * np.exp(-t / 0.0025)
    tail = stereo_noise(len(t)) * amplitude_ratio(-60 * t / 0.22) * inner_echoes * (t > .0006)
    tail = signal.lfilter(*signal.butter(2, 200, "high", fs=SR), tail)   # a small room returns little deep bass
    tail /= np.sqrt(np.sum(tail ** 2) / 2)
    return amplitude_ratio(-.5) * signal.fftconvolve(x[None], tail, axes=1)[:, :N]


def microphones(air):
    """Colour the two sides apart by the tilt, keeping their summed power gain even."""
    tilt_db = at_hz(STEREO_TILT, np.linspace(0, SR / 2, 257))
    colours = []
    for side in (1, -1):
        gain = np.sqrt(2 / (1 + amplitude_ratio(-2 * side * tilt_db)))
        colours.append(signal.firwin2(255, np.linspace(0, 1, 257), gain))
    return signal.fftconvolve(air, colours, "same", axes=1)


def scene():
    """Pot and bottle stand to the left, so the right microphone hears them later."""
    rows = all_snaps()
    water = stream(rows) + lesser_plunges() + snaps(rows) + droplets() + plunges() + gulps()
    water = hollow(water)
    near = water + pot(water) + stopper()
    right_lag_s = 0.00022
    late = np.interp(np.arange(N) - right_lag_s * SR, np.arange(N), near)
    air = np.array([near, late]) + kitchen(near) + hum()
    return microphones(air) + bumps()


def band_limit(x):
    """A steep low-pass at the top of the band."""
    return signal.sosfilt(signal.butter(12, 16850, fs=SR, output="sos"), x)


def record(dry):
    """A steep low-pass cuts the top above 15.8 kHz."""
    mix = band(dry, 8, 15800, "low")
    return band_limit(mix)


dry = scene()
out = record(dry)
wav_record(out)
```